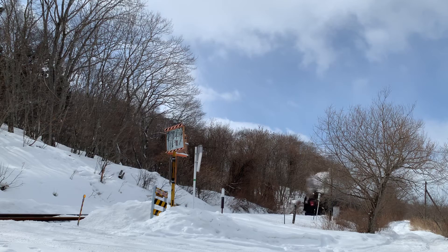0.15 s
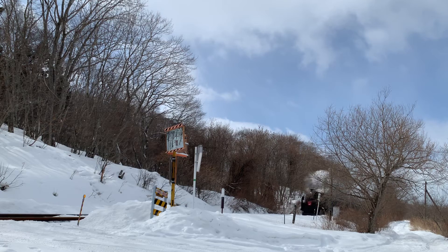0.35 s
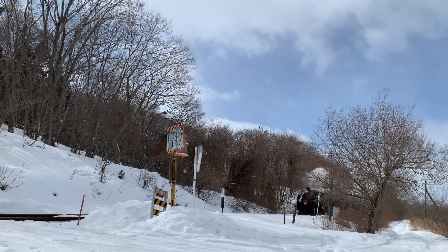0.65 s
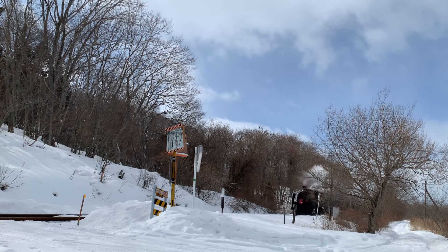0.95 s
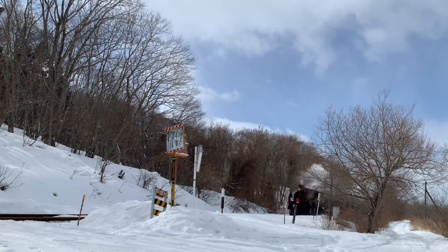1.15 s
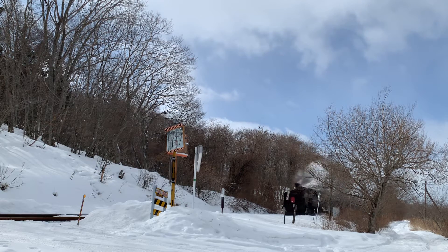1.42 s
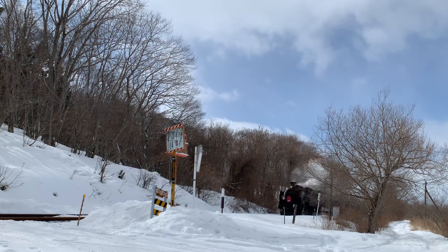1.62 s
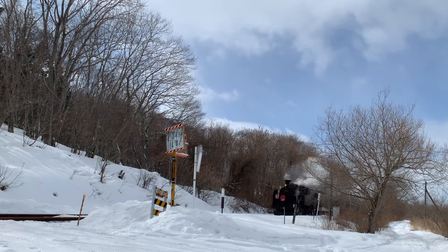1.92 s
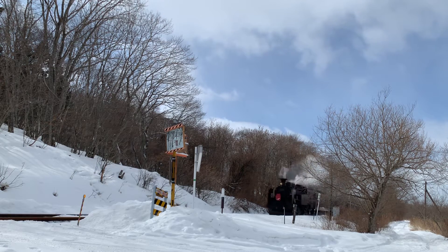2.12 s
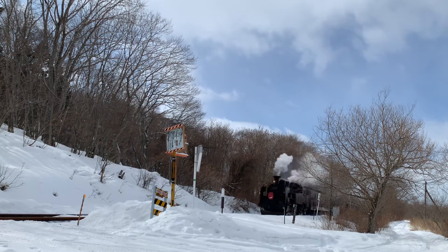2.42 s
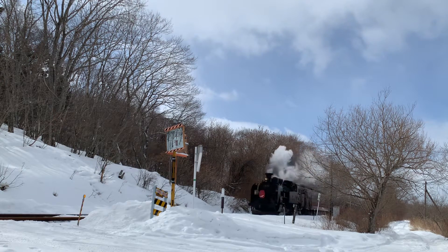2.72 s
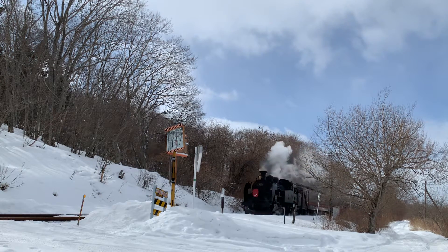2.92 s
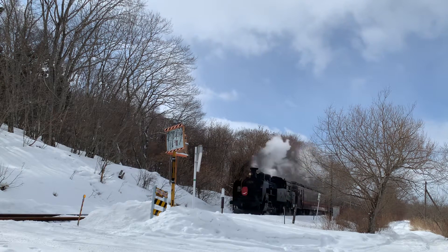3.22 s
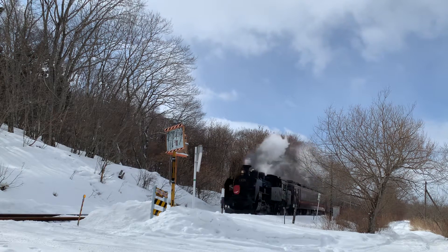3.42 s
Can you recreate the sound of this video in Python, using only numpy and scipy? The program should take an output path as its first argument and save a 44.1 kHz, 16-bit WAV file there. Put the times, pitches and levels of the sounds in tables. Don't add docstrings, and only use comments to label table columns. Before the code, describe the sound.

A steam locomotive approaches outdoors: low rumble, steady hum, wheel roar and fluctuating hiss, then a sudden surge with short metal squeaks and deep, steamy chuffs, heard in stereo from beside the line.

```python
import sys
import numpy as np
from scipy import signal
from scipy.fft import rfft, irfft
from scipy.io import wavfile
from scipy.ndimage import uniform_filter1d

SR = 44100
rng = np.random.default_rng(int(sys.argv[2]) if len(sys.argv) > 2 else 0)


def transcribe(u):
    v = np.clip(np.atleast_2d(u).T, -1, 1)
    q = np.round(v * 32767).astype(np.int16)
    wavfile.write(sys.argv[1], SR, q)


def attenuation_scalar(level_db):
    decades = np.asarray(level_db, float) / 20
    return 10 ** decades


N = 156996


def read(points, at):
    f, value = np.transpose(points)
    return np.interp(np.log(at + 1), np.log(f + 1), value)


def curve(points, x):
    return np.interp(x, *np.transpose(points))


def evened(x):
    return x / np.sqrt(np.mean(x ** 2) + 1e-20)


def power(points, hz):
    p = attenuation_scalar(2 * read(points, hz))
    return (p / p.sum())[:, None]


def lumps(rate_hz):
    hz = np.fft.rfftfreq(N, 1 / SR)
    return evened(irfft(rfft(rng.standard_normal(N)) * np.exp(-(hz / rate_hz) ** 2), N))


def bell(t, centre_s, length_s):
    return np.exp(-.5 * ((t - centre_s) / (length_s / 2)) ** 2)


# (t/s, level/dB)
NEARNESS = [(0, -2), (.2, -7), (.45, -5.5), (.8, -8), (1.1, -6), (1.5, -4), (1.93, -3), (1.98, 0),
            (2.15, -3), (2.3, 0.5), (2.6, 1), (2.95, 0), (3.1, 2.5), (3.3, 1), (3.56, 2.5)]
# (f/Hz, level/dB)
WASH_SPECTRUM = [(90, -52), (140, -2.7), (210, -2), (265, -6), (340, -11), (450, -30)]
# (f/Hz, level/dB)
RUMBLE_SPECTRUM = [(22, -37), (38, -9.5), (55, -7), (80, -8), (120, -11), (150, -28.5), (200, -42.5)]


def rumble(rumble_db=-39, wash_db=-51.5, lumpy_db=3.0):
    hz, near = np.fft.rfftfreq(N, 1 / SR), curve(NEARNESS, np.arange(N) / SR)

    def shaped(spectrum):
        gain = attenuation_scalar(read(spectrum, hz) - 80 * (hz > 500))
        return evened(irfft(rfft(rng.standard_normal((2, N))) * gain, N))

    ground = shaped(RUMBLE_SPECTRUM)
    wash = shaped(WASH_SPECTRUM)
    ground_level = rumble_db + near + lumpy_db * lumps(rate_hz=32)
    return ground * attenuation_scalar(ground_level) + wash * attenuation_scalar(wash_db + near)


def hum(pitch_hz=94.8, level_db=-31.5, follow=0.65):
    t = np.arange(N) / SR
    slow_near = uniform_filter1d(curve(NEARNESS, t), size=12000)
    level = level_db + follow * slow_near + 0.6 * lumps(rate_hz=0.94)
    widening = np.clip((t - 2.68) / 0.44, 0, 1)
    phase = -3.25 - 0.45 * np.array([[-.5], [.5]]) * widening
    return np.sqrt(2) * attenuation_scalar(level) * np.cos(2 * np.pi * pitch_hz * t + phase)


# (f/Hz, width/Hz, level/dB)
WHISTLE_BANDS = [(1935, 25, -59), (2870, 35, -66), (3850, 45, -68), (620, 100, -50), (1050, 40, -60),
                 (1290, 25, -62)]


def whistles(follow=.45):
    hz, t = np.fft.rfftfreq(N, 1 / SR), np.arange(N) / SR
    shape = np.zeros(len(hz))
    for centre_hz, width_hz, db in WHISTLE_BANDS:
        unit_power = np.sqrt(2.5 * width_hz / SR)
        shape += attenuation_scalar(db) * np.exp(-((hz - centre_hz) / width_hz) ** 2) / unit_power
    return irfft(rfft(rng.standard_normal((2, N))) * shape, N) * attenuation_scalar(follow * curve(NEARNESS, t))


# (t/s, level/dB, length/s, f/Hz)
METAL_SQUEAKS = [
    (1.98, -42, 0.027, 611.5),
    (1.986, -44, 0.033, 3840),
    (2.358, -57, 0.034, 3250),
    (2.43, -53.5, .12, 6100),
    (2.49, -51, 0.035, 4570),
    (2.495, -46.5, .06, 3704),
    (2.573, -46, 0.02, 4220),
    (2.559, -56, 0.016, 7440),
]


def squeaks(waver=.004):
    t, out = np.arange(N) / SR, np.zeros(N)
    for middle_s, db, length_s, pitch_hz in METAL_SQUEAKS:
        turns = np.cumsum(pitch_hz * (1 + waver * lumps(rate_hz=35.7))) / SR
        out += attenuation_scalar(db) * bell(t, middle_s, length_s) * np.sin(2 * np.pi * turns)
    return out


# (t/s, level/dB)
STEAM_FLOW = [(0, -5.5), (.16, -6), (.19, -14), (.35, -17), (.38, -5.5), (.68, -4.5), (.78, -14.5),
              (1.08, -7), (1.11, -4.5), (1.24, -5), (1.27, -48), (1.3, -3.5), (1.95, -1.5), (1.965, 6.5),
              (2.14, 4.5), (2.48, 6), (2.75, 1.5), (3.56, 2.5)]
# (f/Hz, level/dB)
ROAR_SPECTRUM = [(300, -11), (350, -14), (420, 2.5), (660, -10), (780, -2.5), (920, -6.5), (1070, -8.5),
                 (1200, -23.5)]
# (f/Hz, level/dB)
RAIL_SPECTRUM = [(1150, -5.5), (1300, -2.5), (1950, 1), (2400, -3.5), (2800, -12), (5000, -22), (8000, -58),
                 (11000, -47)]
# (f/Hz, level/dB)
HISS_SPECTRUM = [(1050, -17), (1300, -4.5), (1950, -3.5), (2700, -10.5), (3800, -11.5), (5200, -14.5),
                 (8000, -24.5), (16000, -44)]
# (f/Hz, level/dB)
FIZZ_SPECTRUM = [(3000, -20), (7000, -5.5), (9500, 2.5), (12000, -27), (14000, -2), (16000, -16)]


def steady_power(hz, t):
    near, steam = curve(NEARNESS, t), curve(STEAM_FLOW, t)
    air_db = np.outer(-1.34 * hz / 1000, np.clip(1 - t / 2.07, 0, 1))
    field = power(ROAR_SPECTRUM, hz) * attenuation_scalar(2 * (-41.5 + near))
    field = field + power(RAIL_SPECTRUM, hz) * attenuation_scalar(2 * (-40.5 + 0.77 * near))
    field = field + power(HISS_SPECTRUM, hz) * attenuation_scalar(2 * (-38.5 + steam))
    field = field + power(FIZZ_SPECTRUM, hz) * attenuation_scalar(2 * (-52.5 + 0.54 * near + air_db))
    top_db = (-3 * np.maximum(hz - 11800, 0) - 50 * np.clip(hz - 13600, 0, 500)) / 1000
    return field * attenuation_scalar(2 * np.outer(top_db, np.clip((0.88 - t) / 0.47, 0, 1)))


# (t/s, level/dB, length/s, f/Hz)
STEAM_PUFFS = [(0.056, -42.5, 0.022, 1800), (0.072, -39.5, 0.039, 560), (0.143, -41, 0.026, 1700),
               (0.61, -42, 0.015, 1400), (1.06, -57, 0.1, 12500), (1.124, -40.5, 0.022, 1970),
               (1.42, -39, 0.025, 1740), (1.485, -49, .06, 6200), (1.608, -38.5, 0.052, 1670),
               (1.97, -46, 0.018, 550), (1.982, -45, 0.029, 5800), (2.06, -41, 0.017, 5600),
               (2.254, -37, 0.11, 594), (2.29, -46.5, 0.13, 9300), (2.277, -37, 0.11, 1340),
               (2.477, -37.5, 0.13, 490), (2.475, -35.5, 0.077, 1300), (2.72, -39, 0.31, 900),
               (2.869, -34, 0.035, 1970), (2.022, -34.5, 0.052, 3700), (2.984, -42, 0.043, 6700),
               (3, -34.5, 0.042, 1750), (3.085, -42, 0.067, 550), (1.983, -37, 0.018, 3900),
               (.32, -46.5, 0.16, 550), (1.968, -44, 0.016, 5600), (2.68, -42, .14, 1960),
               (2.6, -46, .1, 640), (3.41, -41.5, .07, 1900), (2.544, -45, 0.087, 3700),
               (0.85, -62, .14, 14000), (2.9, -51, 0.33, 15500), (3.12, -36, .04, 1940),
               (.03, -54, .07, 5800), (0.605, -45.5, 0.086, 2200), (1.217, -57, 0.046, 6800),
               (1.63, -51, 0.037, 2700), (2.284, -43, 0.1, 3800), (2.89, -45, 0.022, 4500),
               (3.13, -42.5, 0.12, 4000), (3.493, -38.5, 0.088, 4600), (3.382, -33.5, 0.016, 1760),
               (3.479, -36, 0.036, 7100), (3.554, -41, 0.013, 1920)]


def puff_power(hz, t, octaves=0.36):
    field = np.zeros((len(hz), len(t)))
    for middle_s, db, length_s, centre_hz in STEAM_PUFFS:
        band = np.exp(-.5 * (np.log2((hz + 1) / centre_hz) / octaves) ** 2)
        field += attenuation_scalar(2 * db) * np.outer(band / band.sum(), bell(t, middle_s, length_s))
    return field


def rush(patchy_db=1.4, flicker_db=.9, smooth_hz=7000):
    frames, hz = N // 128 + 5, np.fft.rfftfreq(512, 1 / SR)
    t = np.arange(frames) * 128 / SR
    field = steady_power(hz, t) + puff_power(hz, t)
    a, b, c, d, patches, shared = rng.standard_normal((frames, 257, 6)).T
    patches = uniform_filter1d(uniform_filter1d(patches, size=5, axis=0), size=12, axis=1)
    shared = uniform_filter1d(uniform_filter1d(shared, size=60, axis=0), size=4, axis=1)
    uneven_db = patchy_db * evened(patches) + flicker_db * evened(shared)
    uneven_db = uneven_db / (1 + (hz[:, None] / smooth_hz) ** 2)
    z = np.array([a + 1j * b, c + 1j * d]) * np.sqrt(field) * attenuation_scalar(uneven_db)
    return signal.istft(z, nperseg=512, noverlap=384)[1][:, :N] / np.sqrt(8 / 3)


# (t/s, peak level/dB, f/Hz, length/s)
EXHAUST_BEATS = [(.0106, -26.5, 83, 0.013), (.0647, -40, 131, 0.033), (.125, -32, 160, 0.0078),
                 (0.1564, -26, 69, 0.023), (0.26, -29, 71, 0.044), (0.42, -38, 151, 0.01),
                 (0.4427, -26.5, 63, 0.023), (0.596, -31, 58, 0.017), (0.666, -35, 68, 0.059),
                 (0.751, -39, 45, 0.064), (0.839, -42, 62, .05), (0.936, -39, 65, .04),
                 (1.006, -36, 65, 0.05), (1.052, -39, -65, .04), (1.191, -33, 61, 0.046),
                 (1.745, -43, 71, .05), (2.132, -35, 63, .04), (2.395, -38, -63, .035),
                 (1.146, -34, 98, 0.047), (1.1562, -31, 154, 0.011), (1.52, -27, 60, 0.035),
                 (1.9683, -21.5, 88, 0.01), (1.969, -40.5, 220, 0.026), (1.985, -24.5, 59, .03),
                 (2.025, -26, 59.5, 0.051), (2.2628, -14.5, 63.5, 0.04), (2.33, -48, 64, 0.027),
                 (2.461, -15, -55.5, 0.033), (2.585, -21, 66, 0.021), (2.6098, -23.5, 53, 0.035),
                 (2.7138, -14, -58, 0.051), (2.819, -28, 70, 0.035), (2.879, -17, 71, 0.025),
                 (3.058, -17.5, -71, 0.037), (3.325, -49, 44, 0.042), (3.39, -37, 68, 0.014),
                 (3.461, -18, -64, 0.03), (3.49, -23.5, -66, .025)]


def thumps(rise_share=0.4, fall_share=0.38):
    t, out = np.arange(N) / SR, np.zeros(N)
    for peak_s, db, pitch_hz, length_s in EXHAUST_BEATS:
        u = t - peak_s
        spread_s = length_s * np.where(u < 0, rise_share, fall_share)
        swell = np.exp(-.5 * (u / spread_s) ** 2)
        out += np.sign(pitch_hz) * attenuation_scalar(db) * swell * np.cos(2 * np.pi * pitch_hz * u)
    return out


# (t/s, f/Hz)
BASS_MONO_EDGE = [(0, 269), (1.5, 282.2), (1.9, 193), (2.28, 150), (2.36, 65), (2.42, 130), (2.58, 95),
                  (2.75, 40), (3.56, 25)]


def unfolded(hz, t):
    return np.clip((hz / curve(BASS_MONO_EDGE, t) - 1) / 0.58, 0, 1)


# (f/Hz, coherence 0-1)
PORT_COHERENCE = [(50, .985), (130, .75), (260, .7), (520, .92), (700, .85), (900, .45), (1300, .9),
                  (1700, .9), (2600, .45), (5000, .85), (7200, .5), (8600, .92), (9600, .88), (11500, .98)]
# (f/Hz, phase/rad)
RIGHT_LEAD = [(60, 6.28), (130, 5.2), (170, 4.8), (230, 3.8), (290, 1.8), (370, .4), (450, -.2), (880, -.3),
              (1090, 1), (1400, .85), (2300, .65), (3100, 1.7), (4100, .85), (5200, 2.9), (7400, 6.3),
              (8650, 9.42), (16000, 24.08)]
# (f/Hz, level/dB)
PORT_TILT = [(400, -1.2), (860, 2), (1300, -.3), (2000, .7), (2700, 6), (3800, .6), (5900, -4), (7300, 1.5),
             (9000, -.5)]


def ports(pair):
    hz, t, (a, b) = signal.stft(pair, SR, nperseg=2048, noverlap=1536)
    same = np.clip(read(PORT_COHERENCE, hz), 0, 1)[:, None]
    tilt = attenuation_scalar(read(PORT_TILT, hz) / 2)[:, None]
    swing = 2 * np.pi * np.outer(hz * (hz < 7400), 1.5e-5 * (2.2 - t))
    lead = curve(RIGHT_LEAD, hz)[:, None] + swing
    right = same * a * np.exp(1j * lead) + np.sqrt(1 - same ** 2) * b
    wobble = 1 + 0.096 * np.interp(t, np.arange(N) / SR, lumps(rate_hz=6.4))
    ahead = 0.74 * np.outer(np.exp(-((hz - 272) / 110) ** 2), t > 3.02)
    wide = unfolded(hz[:, None] * wobble, t) * (1 - ahead)
    both = a + wide * (np.array([a * tilt, right / tilt]) - a)
    return signal.istft(both, SR, nperseg=2048, noverlap=1536)[1][:, :N]


def scene():
    return ports(rush() + rumble() + whistles() + squeaks()) + hum() + thumps()


def roll_off(x):
    return signal.sosfilt(signal.butter(12, 15630, fs=SR, output="sos"), x)


def record(dry, bass_cut_hz=24):
    steep = (np.fft.rfftfreq(2 * N, 1 / SR) / bass_cut_hz) ** 4
    cut = irfft(rfft(dry, 2 * N) * steep / (1 + steep), 2 * N)[:, :N]
    return roll_off(cut)


dry = scene()
out = record(dry)
transcribe(out)
```